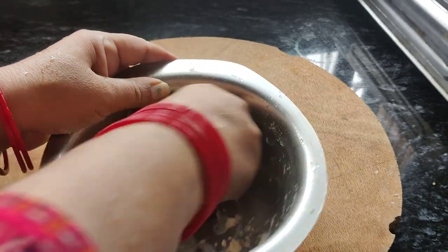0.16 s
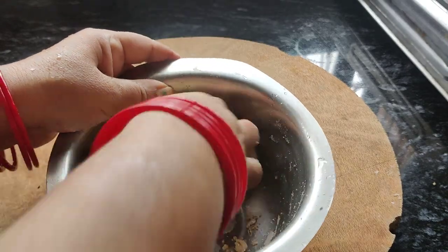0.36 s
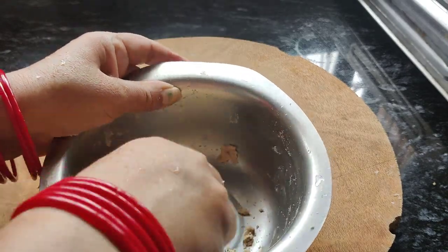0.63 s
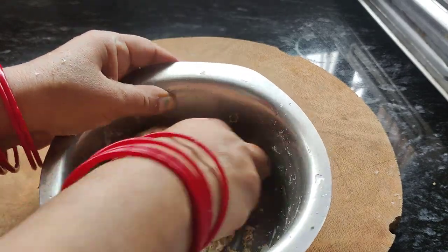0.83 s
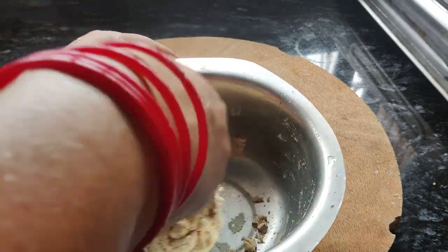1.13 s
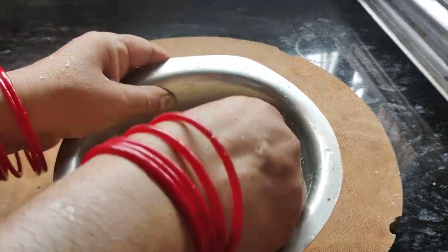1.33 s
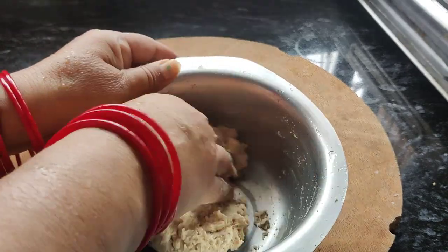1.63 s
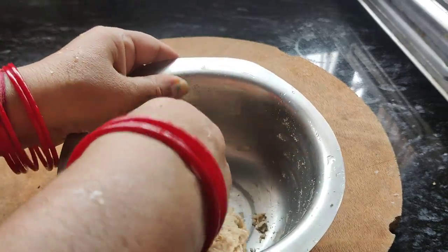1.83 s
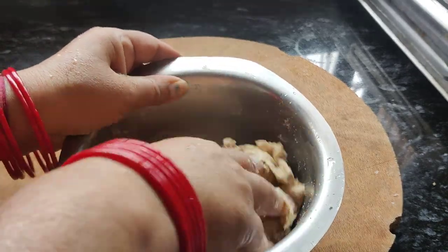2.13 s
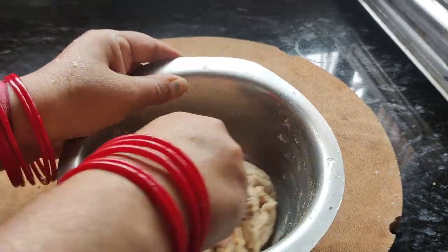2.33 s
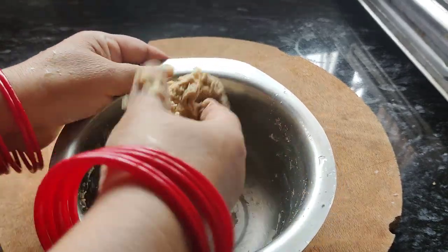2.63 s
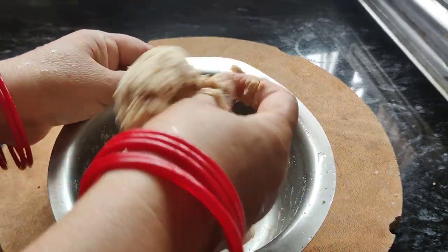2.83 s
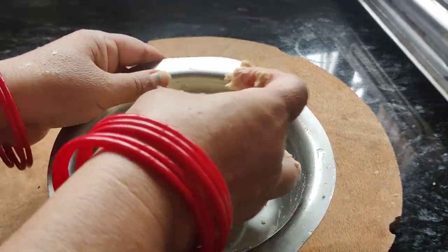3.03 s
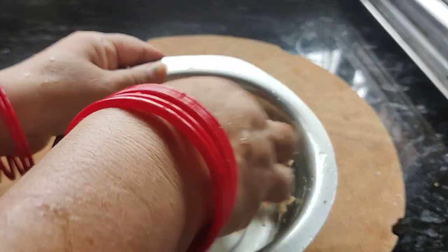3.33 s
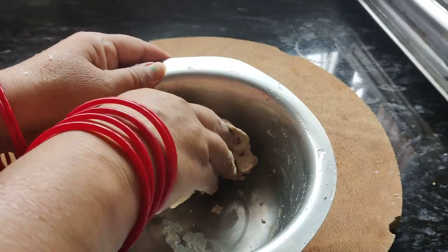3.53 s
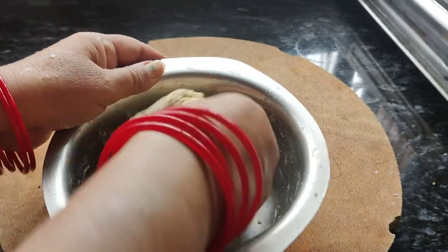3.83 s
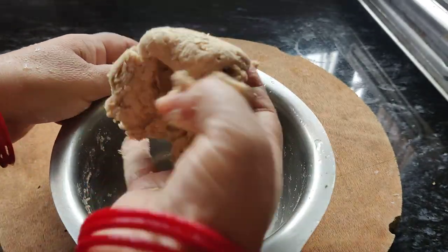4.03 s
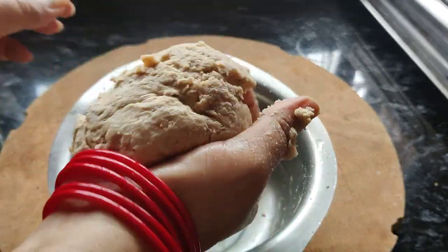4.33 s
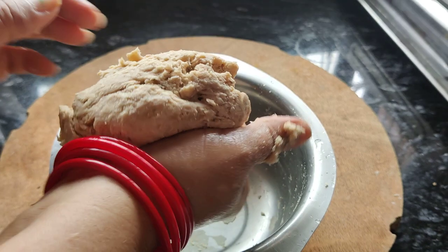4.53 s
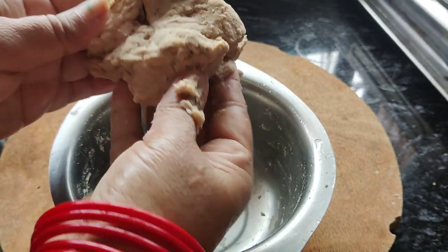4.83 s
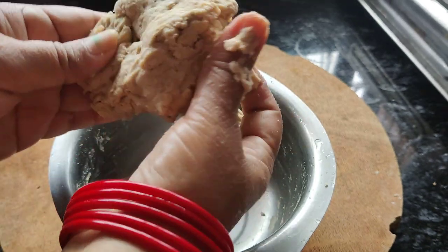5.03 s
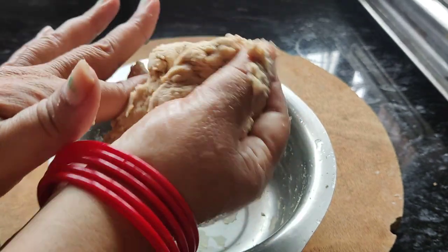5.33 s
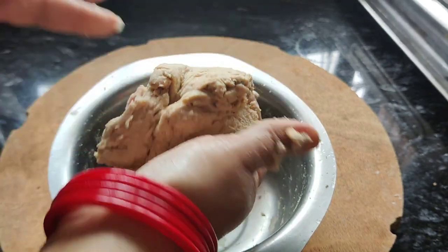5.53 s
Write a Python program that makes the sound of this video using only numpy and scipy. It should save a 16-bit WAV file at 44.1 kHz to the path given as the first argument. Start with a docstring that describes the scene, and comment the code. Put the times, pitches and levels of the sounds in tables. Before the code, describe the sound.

Close kitchen sounds of dough kneaded in a rocking steel bowl, with metallic rattles, clinking bangles and dull thumps on a wooden board.

```python
"""Kneading dough in a steel bowl

Dough is kneaded by hand in a steel bowl that rocks on a wooden board in a hard-walled kitchen, heard at
a close pair of microphone ports. Bangles and rim clank on the steel in short rattles (bounces feeding
sine modes and dying noise), the bangles clink on each other (clicks and short high modes), and the board
thumps (low modes and a dry knock). Behind them lie a low rumble and a soft hiss, both of filtered noise.
Late on the dough is lifted out and the bowl rings more freely."""
import sys
import numpy as np
from scipy import signal
from scipy.fft import rfft, irfft
from scipy.io import wavfile
from scipy.ndimage import uniform_filter1d

SR = 44100
rng = np.random.default_rng(int(sys.argv[2]) if len(sys.argv) > 2 else 0)


def wrap_up_sound(samples):
    """Save the sound to the file named by the first command line argument, as 16-bit audio."""
    columns = np.atleast_2d(samples).T
    # keep every value between -1 and 1, then stretch to whole-number steps
    tamed = np.clip(columns, -1, 1)
    steps = np.round(tamed * 32767).astype(np.int16)
    wavfile.write(sys.argv[1], SR, steps)


N = 249682  # length in samples
RING = 2 ** 15  # longest ring in samples
LEFT_DB = 2  # left over right, for board and background


def amp(db):
    """Gain of a dB value."""
    return 10 ** (np.asarray(db) / 20)


def evened(x):
    """Scaled to rms 1."""
    return x / np.sqrt(np.mean(abs(x) ** 2) + 1e-20)


def read(points, hz):
    """A table of (Hz, value) joined on a log-frequency axis."""
    f, value = np.transpose(points)
    return np.interp(np.log(hz + 1), np.log(f + 1), value)


def panned(sound, left_db):
    """Two channels with the left raised over the right by left_db."""
    return sound * amp([[left_db / 2], [-left_db / 2]])


def add(mix, s, sound, left_db):
    """Mixes a two-channel sound in at time s, cut off at the end of the mix."""
    part = mix[:, round(s * SR):][:, :sound.shape[1]]
    part += panned(sound[:, :part.shape[1]], left_db)


def ports(a, b, hz):
    """Two partly alike spectra as the two ports hear them; the bass arrives in step."""
    # likeness of right to left: f/Hz, correlation (negative = opposed)
    likeness = [(60, 0.95), (180, 1), (550, 0.25), (1650, 0.055), (4970, -0.26), (9000, 0), (15000, 0)]
    # phase by which left leads, before it shrinks in the bass: f/Hz, phase/rad
    phase_lead = [(0, -3.5), (1810, 1.07), (2330, 0.5), (2580, 6.97), (3190, 1.96), (5600, -1.08),
                  (5930, -4.7), (7150, -13), (9130, -19.5), (10200, -10), (16500, -17)]
    same = np.clip(read(likeness, hz), -1, 1)
    lead = read(phase_lead, hz) * hz / (hz + 300)
    left = a * np.exp(1j * lead)
    right = same * a + np.sqrt(1 - same ** 2) * b
    return np.array([left, right])


def modes(table, size):
    """Every mode's dying sine at both ports: (2, modes, samples)."""
    hz, db, t60 = np.transpose(table)[:, :, None]
    t = np.arange(size) / SR
    lead = np.array([np.angle(ports(1, 0, hz)[0]), 0 * hz])
    return amp(db - 60 * t / t60) * np.sin(2 * np.pi * hz * t + lead)


def struck(rings, spread_db):
    """Each blow lands elsewhere, so it wakes the modes unevenly."""
    mode_gain = amp(spread_db * rng.standard_normal(rings.shape[1]))
    return np.einsum("m,cmt->ct", mode_gain, rings)


def rattle(ms, per_s=600):
    """A first contact, then a clump of uneven bounces that keeps up for about ms and stops."""
    t = np.arange(4000) / SR / (ms / 1000 + 1e-4)  # in rattle lengths
    chance, size = rng.random((2, len(t)))
    bounces = (chance < per_s / SR) * (2 * size - 1) * np.exp(-t ** 4)
    bounces[0] = .55  # first contact
    return bounces[None]


def decaying_noise(colour, t60, size, sparse=1., lumpy_db=0.):
    """Noise at both ports whose bands die at their own speeds; lumpy_db makes some narrow bands stand out."""
    raw = rng.standard_normal((2, size)) * (rng.random((2, size)) < sparse)
    hz, t, z = signal.stft(raw, SR, nperseg=256)
    colour_db = read(colour, hz) + lumpy_db * rng.standard_normal(len(hz))
    decay_db = -60 * t / read(t60, hz)[:, None]
    z = ports(*z, hz[:, None]) * amp(colour_db[:, None] + decay_db)
    return signal.istft(z, SR, nperseg=256)[1][:, :size]


def hiss():
    """Soft noise whose level wanders in time and in patches of time and frequency."""
    # relative colour: f/Hz, density/dB per Hz
    hiss_colour = [(35, -52), (60, -5.5), (150, -6), (194, -18), (252, -9), (393, -20.5), (497, -18),
                   (675, -20.5), (1400, -25.5), (2640, -26), (3500, -28), (6010, -22), (7600, -31),
                   (15000, -38), (16500, -61)]
    # level above 400 Hz: t/s, level/dB
    hiss_level = [(0.0, -67.5), (0.3, -53), (0.79, -64), (0.98, -54), (1.28, -60.5), (1.83, -58.5),
                  (2.08, -62), (2.59, -59.5), (3.1, -62), (3.55, -73.5), (3.77, -58.5), (4.29, -64.5),
                  (4.71, -55), (4.98, -63), (5.66, -60.5)]
    frames, hz = N // 256 + 5, np.fft.rfftfreq(1024, 1 / SR)[:, None]
    a, b, c, d, patches = rng.standard_normal((frames, 513, 5)).T
    patches = uniform_filter1d(patches, size=12, axis=0)
    patches = evened(uniform_filter1d(patches, size=14, axis=1))
    z = ports(a + 1j * b, c + 1j * d, hz) * amp(read(hiss_colour, hz) + 1.18 * patches)
    noise = signal.istft(z, nperseg=1024, noverlap=768)[1][:, :N]
    above = signal.sosfilt(signal.butter(2, 400, "high", fs=SR, output="sos"), noise)
    level_db = np.interp(np.arange(N) / SR, *np.transpose(hiss_level))
    return noise / np.sqrt(np.mean(above ** 2)) * amp(level_db)


def rumble():
    """Noise in one low resonance, levelled over short spans and then made to waver."""
    # waver of the rumble: t/s, level/dB
    rumble_level = [(0.0, -56), (0.14, -51.5), (0.8, -52.5), (0.94, -43.5), (1.8, -59), (1.87, -46.5),
                    (2.11, -57.5), (2.76, -50), (3.53, -65), (3.58, -49), (4.08, -58), (5.28, -54.5),
                    (5.33, -49.5), (5.66, -52)]
    centre_hz, half_width_hz = 35.8, 7.1
    hz = np.fft.rfftfreq(N, 1 / SR)
    shape = 1 / (1 + ((hz - centre_hz) / half_width_hz) ** 2)
    low = irfft(ports(*rfft(rng.standard_normal((2, N))), hz) * shape, N)
    low = low / np.sqrt(uniform_filter1d((low ** 2).mean(0), 4000) + 1e-12)
    return low * amp(np.interp(np.arange(N) / SR, *np.transpose(rumble_level)))


def background():
    """The hiss and the rumble together, a little to the left."""
    return panned(hiss() + rumble(), LEFT_DB)


def kitchen(x):
    """Hard walls and counter return a sparse, dying scatter of echoes, the treble dying soonest."""
    # reverberation: f/Hz, t60/s
    room_t60 = [(200, 0.73), (1000, 0.66), (4000, 0.59), (8000, 0.44), (16000, 0.46)]
    room_db, first_echo_s = -9, .006
    tail = decaying_noise([(20, 0.018), (20000, 0.011)], room_t60, RING, 0.057)
    tail = tail * (np.arange(RING) > first_echo_s * SR)
    return amp(room_db) * signal.fftconvolve(x, tail / np.linalg.norm(tail[0]), axes=1)[:, :N]


def board():
    """The bowl's foot or the dough drops: a dry knock, then the board, whose low modes the soft blow wakes most."""
    # thumps: t/s, peak level/dB, extra gain of the deepest mode/dB, knock level/dB, knock f/Hz
    thumps = [(0.321, -35, 8, -40, 786), (0.824, -31.5, -8, -75, 800), (1.016, -32.5, 6, -41, 820),
              (1.245, -49, -3, -38, 1000), (1.665, -25, 0.5, -24, 1094), (2.135, -44.5, 14.5, -46, 1010),
              (2.258, -62, -15, -54, 740), (2.339, -34, -14, -44, 800), (2.769, -71, -16.5, -53, 1520),
              (3.233, -53.5, 5.5, -46.5, 1780), (4.139, -27, -8, -24.5, 1506)]
    # modes of the wood before the blow's softness, deepest first: f/Hz, level/dB, t60/s
    wood_modes = [(84.4, 2.5, 0.65), (99.7, -12, 1), (138.6, -3, 0.29), (212.7, -1, 0.13),
                  (256.4, -8, 0.31), (306, 0, 0.083), (321, -9, 0.38), (813, 3.5, 0.04), (1500, -21, 0.021)]
    blow_hz = 602  # sharpness of a blow
    out, rings, t = np.zeros((2, N)), modes(wood_modes, RING), np.arange(RING) / SR
    blow = signal.butter(2, blow_hz, fs=SR)
    for s, db, deep_db, knock_db, knock_hz in thumps:
        woken = struck(rings[:, 1:], 4.1) + amp(deep_db) * rings[:, 0]
        thump = signal.lfilter(*blow, woken)
        grit = signal.lfilter(*signal.butter(2, 2.0 * knock_hz, fs=SR), rng.standard_normal(RING))
        # the knock sounds its pitch and the octave below
        knock = np.sin(2 * np.pi * knock_hz * t) + .6 * np.sin(2 * np.pi * .5 * knock_hz * t)
        knock = knock * amp(-60 * t / .02) * (1 - np.exp(-t / .0007))
        knock += grit * amp(-60 * t / .025)
        add(out, s, amp(db) * thump / abs(thump).max() + amp(knock_db) * knock, LEFT_DB)
    return out


def bangles():
    """Thin hoops tick on each other: a click and two groups of short high rings; every hoop is tuned apart."""
    # clinks: t/s, onset level/dB, gain of the low group over the high/dB, rattle length/ms
    clinks = [(0.304, -37, -20, 11), (0.3333, -29.5, 2, 30.4), (0.346, -30, 8, 24),
              (0.378, -35.5, -12.5, 12), (0.3904, -35, 6, 17), (1.0464, -27.5, -1, 20),
              (1.0821, -23, 3, 27), (1.1747, -38.5, 0, 11), (1.243, -39, 0, 8.4),
              (1.4333, -37.5, -2.5, 9.2), (1.77, -24.5, 7, 7.7), (1.8442, -33.5, -4, 17),
              (1.93, -48, -11, 5.3), (2.868, -49, -4, 5.6), (2.888, -51, -4, 16), (2.9179, -45, 0, 19),
              (3.016, -46, -5, 4.1), (3.0663, -59, -5, 6.5), (3.8626, -44, 17, 14), (3.88, -40.5, 6, 13),
              (3.921, -34.5, -3, 8.4), (3.936, -32.5, 0, 20), (3.9633, -30, -17, 12),
              (3.9736, -30.5, 5, 10), (3.3857, -71, -21, 7), (4.3694, -52, 11, 5.5), (4.8786, -48, 8, 7.8),
              (4.987, -56.5, 11, 7), (5.174, -45, -6, 2.7), (5.449, -50, 15, 6.7), (5.518, -48.5, -17, 2.4),
              (5.534, -46, -1, 5.6), (5.567, -46.5, 5, 6.1)]
    # low group of rings before detuning: f/Hz, level/dB, t60/s
    low_modes = [(4270, -16, .025), (8150, 0, .035), (8450, -4, .03), (9300, -8, .03)]
    # high group of rings before detuning: f/Hz, level/dB, t60/s
    high_modes = [(12800, 0, .025), (13450, 0, .03), (14300, -6, .02), (15300, -8, .015)]
    out, size, left_db = np.zeros((2, N)), 2048, 2.5
    for s, db, low_db, ms in clinks:
        clink = 0
        for tuning in 1 + .014 * rng.standard_normal(3):  # three hoops
            low = modes(np.multiply(low_modes, [tuning, 1, 1]), size)
            high = modes(np.multiply(high_modes, [tuning, 1, 1]), size)
            tick = rng.standard_normal((2, size)) * amp(-60 * np.arange(size) / SR / 0.006)
            ring = struck(high, 3.) + amp(low_db) * struck(low, 3.)
            ring += 1.5 * np.diff(tick, prepend=0)  # the difference brightens the click
            clink = clink + signal.fftconvolve(ring, rattle(ms, 400), axes=1)
        onset_rms = np.sqrt((clink[:, :600] ** 2).mean())
        add(out, s, amp(db) * clink / onset_rms, left_db)
    return out


def bowl():
    """Rattling contacts crack, then ring the clear and the dense modes of the steel; the contact sets the colour."""
    # clanks: t/s, level near 6 kHz/dB, then relative to it 900 Hz/dB, 3 kHz/dB, 12 kHz/dB,
    # favoured middle mode f/Hz, favoured upper mode f/Hz, rattle length/ms
    clanks = [(0.133, -23.5, -7.5, -13, -6, 2690, 5550, 23.7), (0.152, -38.5, -1.5, 9, 9, 3505, 5550, 4.6),
              (0.313, -27.5, -16.5, -13, -14, 4269, 5928, 4.5), (0.737, -48, -3, 6, 14, 3828, 5928, 3.7),
              (0.793, -55, -10, 3, 6, 3192, 6365, 1.6), (0.821, -26.5, -11.5, 0.5, 2, 2842, 6365, 15),
              (0.83, -23.5, -7, -2.5, -6, 3505, 6365, 7), (0.87, -24.5, -7, -10.5, -3, 3828, 5550, 4.6),
              (0.991, -34.5, -5.5, -3, -2, 3410, 5928, 4.6),
              (1.032, -28, -10.5, -10.5, -7, 4085, 5590, 8.3),
              (1.047, -24.5, -15, -18.5, -7, 4085, 5590, 34), (1.082, -28.5, -17, -8.5, -7, 3410, 5928, 22),
              (1.112, -34.5, -10, -10.5, -1, 3192, 5928, 9.4), (1.133, -37, -5, -12, -30, 3085, 5928, 6),
              (1.244, -47, -2, 0.5, -11.5, 3085, 6365, 2.5), (1.686, -37.5, 4.5, -3.5, -6, 2375, 5928, 29),
              (1.698, -29.5, -6, -4.5, -0.5, 2375, 5928, 10.6), (1.753, -35.5, -9, 3, 13, 4085, 5928, 20),
              (1.768, -36.5, -0.5, 4.5, 7.5, 4085, 6731, 29.4), (1.835, -40, -7, -6, -1.5, 3410, 5928, 47),
              (1.87, -40, -4.5, 2, 4, 3192, 5928, 13), (1.928, -42.5, -9, -4, -3, 3085, 5928, 7.9),
              (2.257, -59.5, -7, 8.5, 8, 3828, 5928, 2.2), (2.332, -23.5, -12.5, -8.5, -5, 3828, 6731, 18),
              (2.352, -36, -13, 4.5, 2, 3828, 6543, 11.5), (2.495, -48.5, -7, -8, -0.5, 2375, 6365, 5),
              (3.581, -35, 2, -20, -4, 4085, 6731, 6.9), (3.586, -18, -11, -8.5, -3, 3192, 5928, 8.1),
              (3.761, -41, -8.5, 3, 7, 3192, 5590, 3.1), (3.795, -40, -7, -2.5, 0.5, 3192, 5928, 5.7),
              (3.907, -28, -24.5, -20, -12, 3410, 5928, 6.9), (4.004, -20, -7.5, -8.5, -1, 3505, 5590, 5),
              (4.389, -52.5, -17, -6, -8, 2842, 6543, 2.1), (4.512, -36, -8.5, 0, -1.5, 2375, 7140, 26.6),
              (4.582, -44.5, -10.5, -2, -3, 2375, 7140, 24), (4.679, -42, -13, -5, -1.5, 3085, 6731, 7.2),
              (4.724, -28.5, -11, -1.5, -3, 2690, 6731, 10.4), (5.195, -37, -6, 0.5, 2, 3192, 7537, 20.4),
              (5.222, -37, -41, 0.5, -11, 3192, 7537, 18), (5.622, -47, 3, 5.5, -7, 3410, 7332, 33),
              (5.638, -36.5, -31, 7.5, 5.5, 3410, 7537, 11)]
    # clear modes of the bowl: f/Hz
    mode_hz = [694, 808, 842, 1156, 1448, 1647, 1950, 2223, 2375, 2690, 2842, 3085, 3192, 3410, 3505, 3828,
               4085, 4269, 4791, 5550, 5590, 5928, 6365, 6543, 6731, 6907, 7001, 7140, 7332, 7537]
    # the same modes: level with dough in/dB, level with dough out/dB, t60 before hand and dough damp it/s
    mode_levels = [(-9, -8, .25), (-5, -14, .2), (-4, -14, .25), (-8, -10, .25), (-18, -16, .6),
                   (-19, -16, .55), (-19, -16, .5), (-15, -11, .45), (-11, -11, .7), (-16, -12, 1.1),
                   (-13, -13, .45), (-13, -8, .45), (-9, -8, .55), (-8, -11, .45), (-14, -10, .5),
                   (-9, -6, .5), (-12, -8, .35), (-13, -10, .35), (-20, -18, .4), (-10, -8, .3),
                   (-9, -11, .4), (-3, -8, .65), (-6, -9, .4), (-5, -9, .35), (-2, -8, .4), (-11, -9, .35),
                   (-11, -11, .3), (-13, -12, .4), (-14, -8, .3), (-14, -6, .4)]
    # relative colour of the countless small modes of thin steel: f/Hz, density/dB per Hz
    dense_colour = [(180, -45), (300, -3), (513, -25.5), (807, 0.5), (1130, -11), (1900, -13), (2400, -5),
                    (3900, -5), (4850, -17.5), (5740, 5), (6560, -1), (9650, -14.5), (13500, -11.5),
                    (15700, -6), (16500, -46.5)]
    # their decay before hand and dough damp it: f/Hz, t60/s
    dense_t60 = [(300, 0.99), (900, 0.029), (2000, 0.48), (4000, 0.32), (6500, 0.14), (10000, 0.59),
                 (16000, 0.17)]
    lift_start_s, lift_s, free_share = 4.395, 0.54, 0.81  # the dough leaves the bowl, which then rings freely
    hand_damp, tap_damp, tap_ms = 58.5, 60.5, 5  # dB/s, dB/s, ms: brief light taps are damped most
    firm_db, firm_span_db = -31.5, 10  # contacts from firm_db up escape the extra damping
    free_dense_db, free_damp = -9, -32  # dB, dB/s: with dough out the clear modes stand out and last longer
    dense_db, crack_db = -1, 12.5  # dense ring; first crack over that ring
    favour_mid_db, favour_top_db = 5, 11
    valley_hz, valley_depth_db = 1750, -6  # the steel speaks little between its low and middle modes
    left_db = 2.5

    out, t, hz = np.zeros((2, N)), np.arange(RING // 2) / SR, np.fft.rfftfreq(RING, 1 / SR)
    mode_hz = np.array(mode_hz)
    loaded_db, free_db, t60 = np.transpose(mode_levels)
    rings = modes(np.transpose([mode_hz, 0 * t60, t60]), RING // 2)
    valley_db = valley_depth_db * np.exp(-(np.log(hz / valley_hz + 1e-9) / 0.21) ** 2)
    bands = [(600, 1400), (2000, 4500), (5000, 7500), (8000, 16000)]  # Hz
    for s, db, low_db, mid_db, high_db, mid_hz, top_hz, ms in clanks:
        share = free_share * np.clip((s - lift_start_s) / lift_s, 0, 1)
        bounces = rattle(ms)
        tap = np.exp(-(ms / tap_ms) ** 2) * np.clip((firm_db - db) / firm_span_db, 0, 1)
        damp = hand_damp + free_damp * share + tap_damp * tap

        # the place of contact favours two modes
        near_mid, near_top = [np.exp(-((mode_hz / f - 1) / .015) ** 2) for f in (mid_hz, top_hz)]
        favoured_db = favour_mid_db * near_mid + favour_top_db * near_top
        mode_db = loaded_db + share * (free_db - loaded_db) + favoured_db
        clear = evened(struck(rings * amp(mode_db)[:, None], 3.))
        fed = np.sqrt(np.cumsum(np.pad(bounces[0], (0, len(t)))[:len(t)] ** 2))  # each bounce adds energy

        dense = evened(decaying_noise(dense_colour, dense_t60, RING // 2, .1, lumpy_db=3.5))
        crack = amp(crack_db - 60 * t / .04)
        dense *= amp(dense_db + free_dense_db * share) * (1 + crack)
        ring = clear * fed + signal.fftconvolve(dense, bounces, axes=1)[:, :len(t)]
        ring *= amp(-damp * t) * (1 - (t / t[-1]) ** 4)  # damped, and faded to silence

        # the contact's four bands are brought to their levels
        contact = round((ms + 6) / 1000 * SR)
        power = abs(rfft(ring[:, :contact], 4096)) ** 2 / (4096 * contact)
        has_db = [10 * np.log10(power[:, lo * 4096 // SR:hi * 4096 // SR].sum()) for lo, hi in bands]
        gain_db = db + np.array([low_db, mid_db, 0, high_db]) - has_db
        colour = [(480, gain_db[0] - 9), *zip((750, 3200, 6200, 11000), gain_db), (16000, gain_db[3] - 12.5)]
        clank = irfft(rfft(ring, RING) * amp(read(colour, hz) + valley_db))
        add(out, s, clank[:, :RING * 3 // 4], left_db)
    return out


def scene():
    """Background, then board, bangles and bowl in the kitchen; the bangles are driest."""
    behind = background()
    thumps_and_clanks, clinking = board() + bowl(), bangles()
    sent = thumps_and_clanks + amp(-3) * clinking
    return behind + kitchen(sent) + clinking + thumps_and_clanks


def record(dry):
    """The top band drops a step, then ends."""
    edge_hz, top_hz = 15900, 17000
    hz = np.fft.rfftfreq(N, 1 / SR)
    corners_hz = [edge_hz - 60, edge_hz + 60, top_hz - 40, top_hz + 40]
    step_db = np.interp(hz, corners_hz, [0, -18, -18, -90])
    return irfft(rfft(dry) * amp(step_db), N)


dry = scene()
out = record(dry)
wrap_up_sound(out)
```